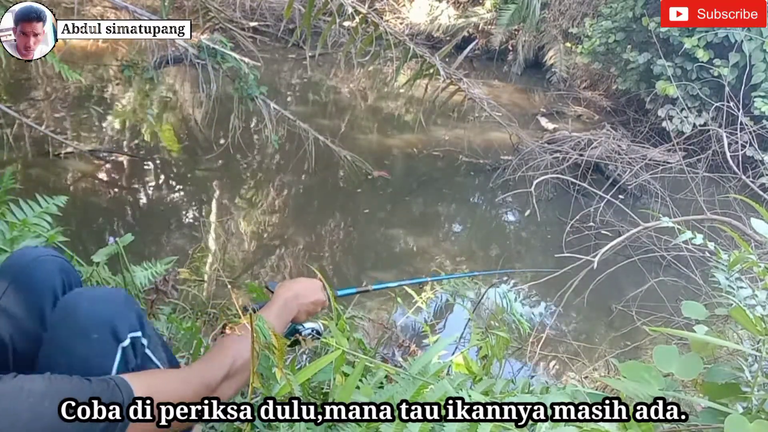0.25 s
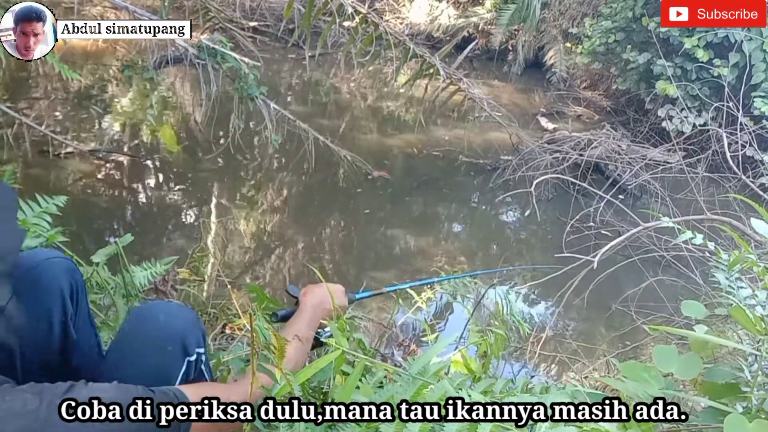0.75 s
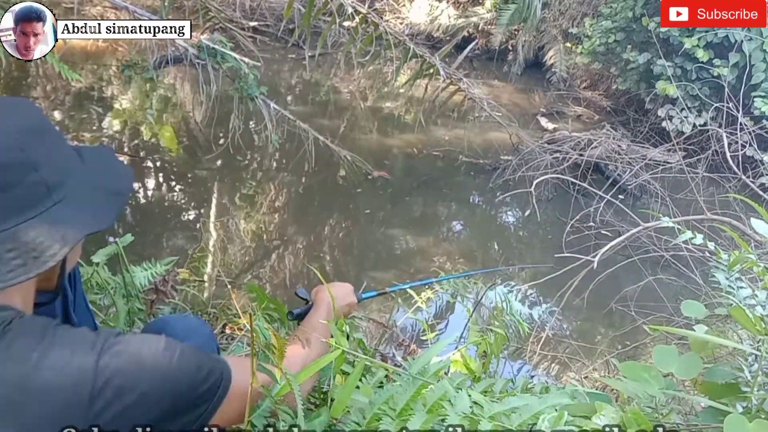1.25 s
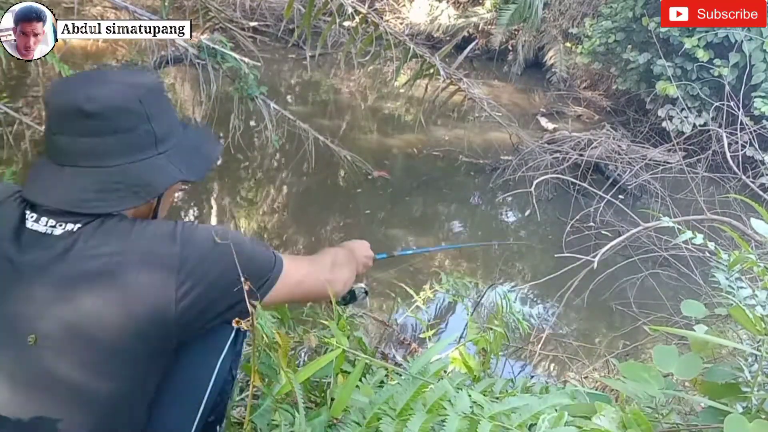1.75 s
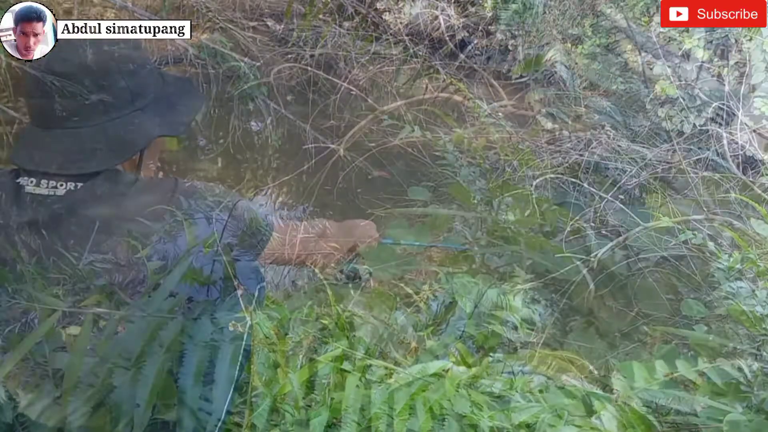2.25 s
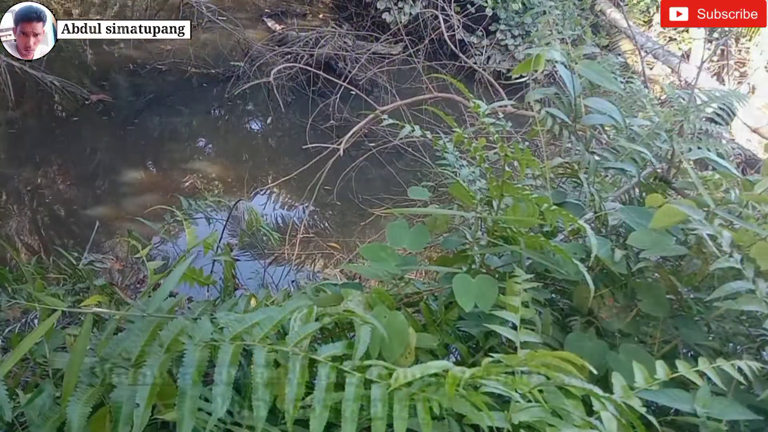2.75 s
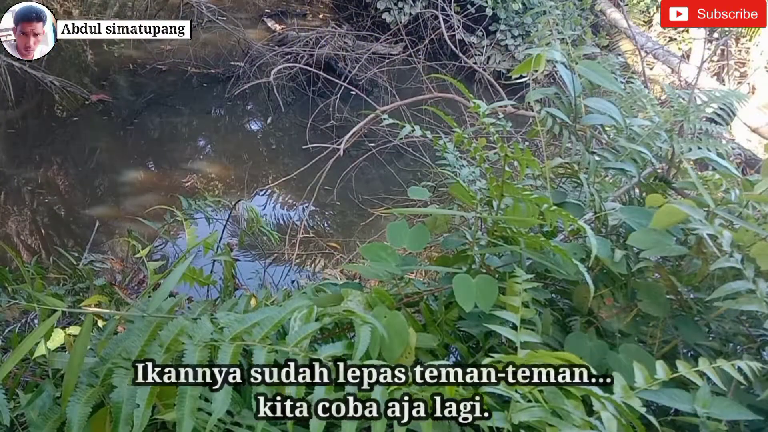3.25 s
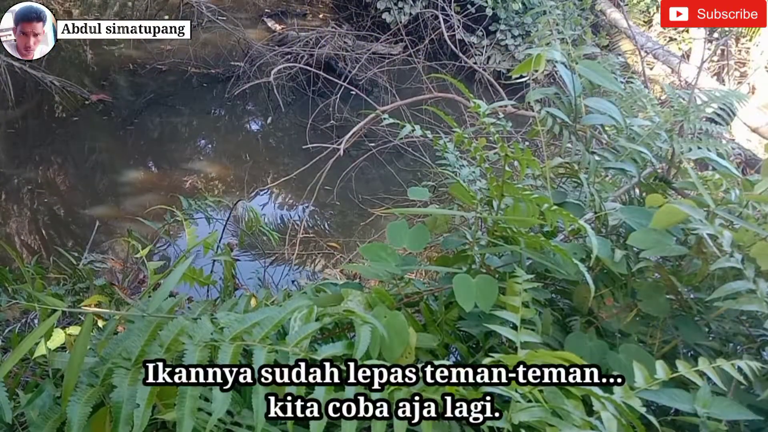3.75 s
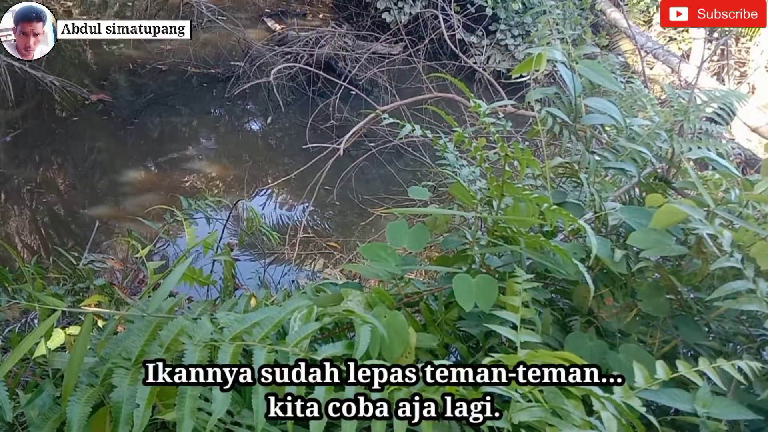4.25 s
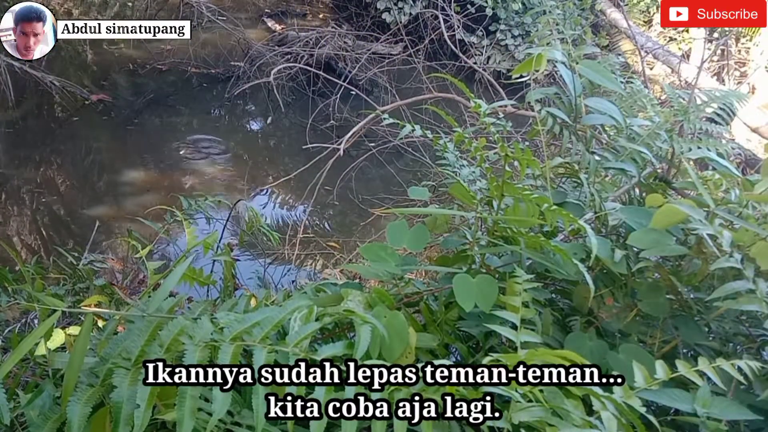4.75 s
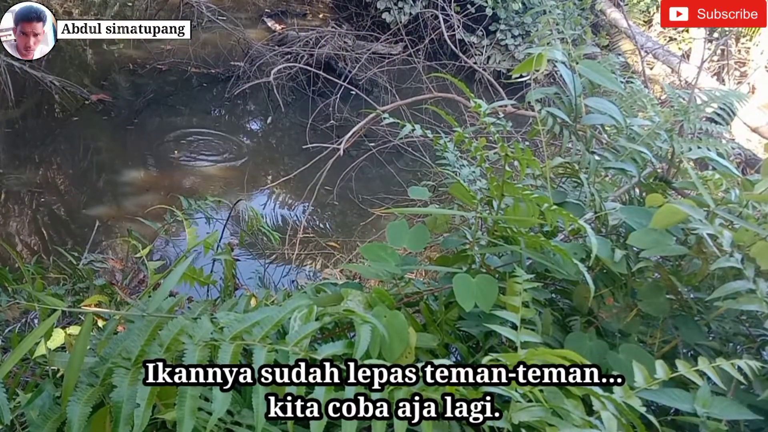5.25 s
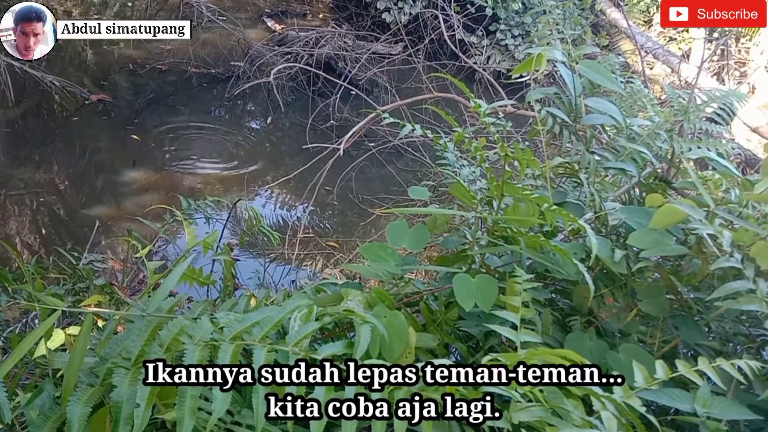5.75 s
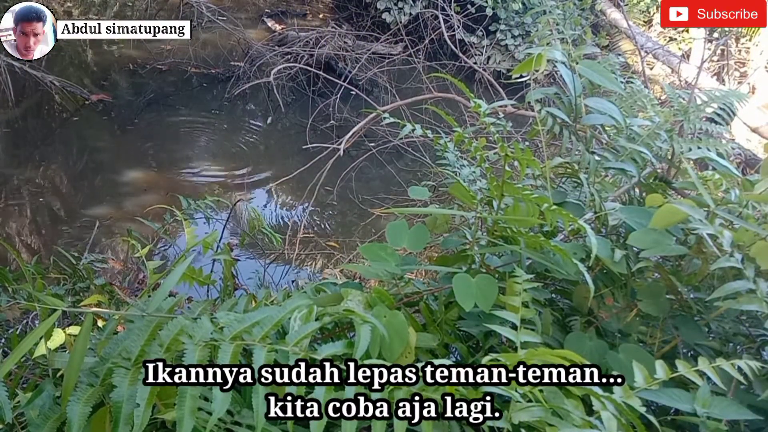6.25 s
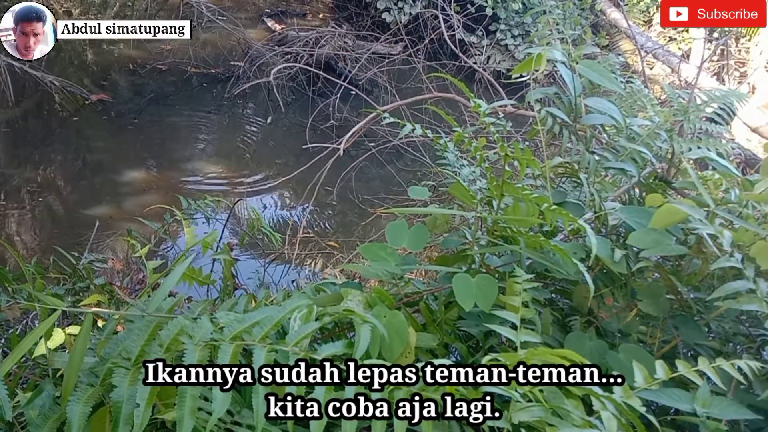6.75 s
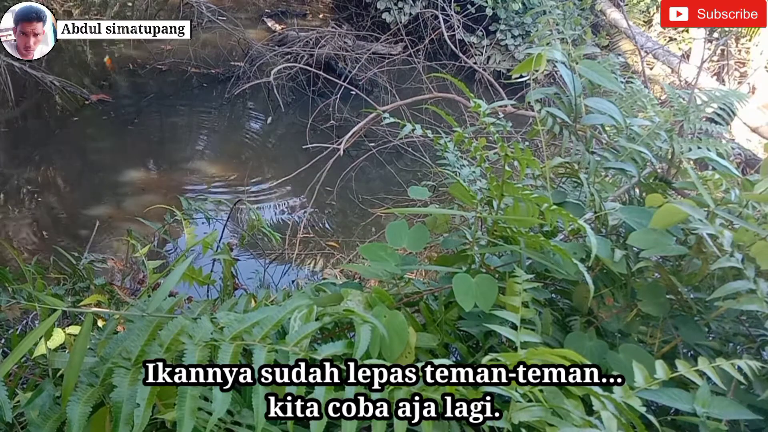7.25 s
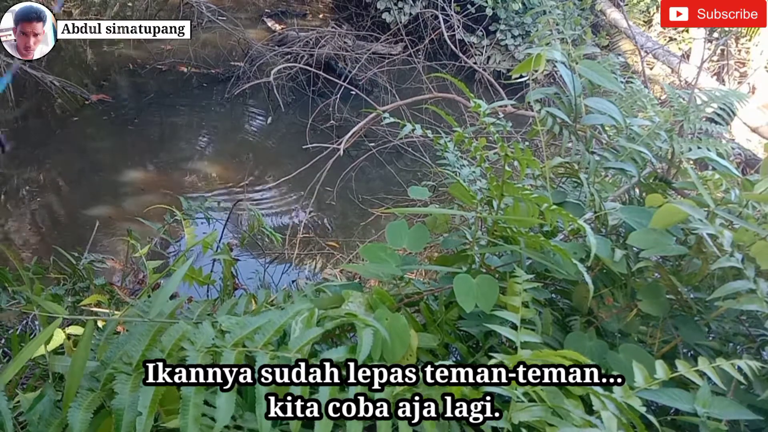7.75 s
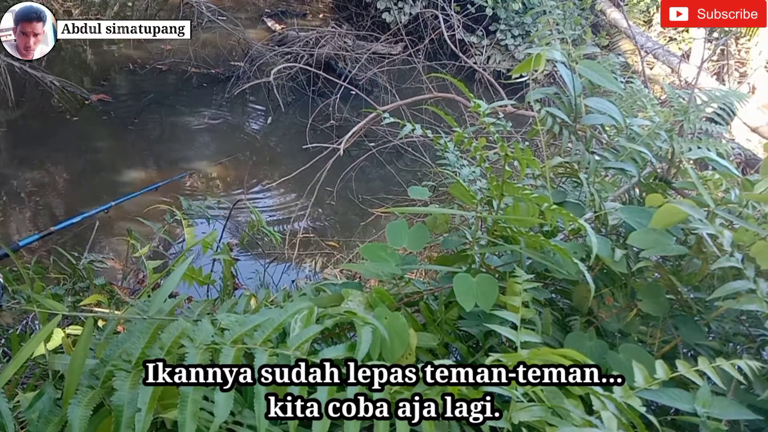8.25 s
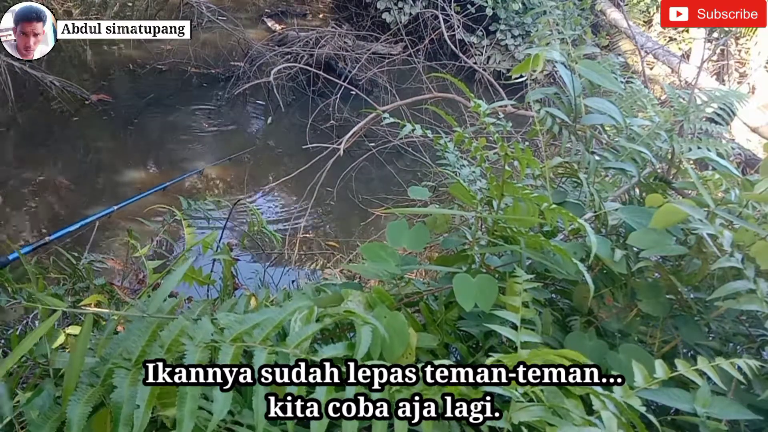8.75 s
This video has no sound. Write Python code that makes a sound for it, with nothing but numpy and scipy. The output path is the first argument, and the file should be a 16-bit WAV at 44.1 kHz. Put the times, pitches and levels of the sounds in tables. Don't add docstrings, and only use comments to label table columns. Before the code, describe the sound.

A high, steady cricket hiss covers a creek bank, with faint bird coos and whistles, twig snaps, and one loud crack echoing over water.

```python
import sys
import numpy as np
from scipy import signal
from scipy.fft import rfft, irfft
from scipy.io import wavfile

SR = 44100
rng = np.random.default_rng(int(sys.argv[2]) if len(sys.argv) > 2 else 0)


def gain_from_db(level_db):
    decades = np.asarray(level_db, float) / 20
    return 10 ** decades


def waveform_to_disk(signal):
    frames = np.transpose(np.atleast_2d(signal))
    scaled = np.clip(frames, -1, 1) * 32767
    samples = np.round(scaled).astype(np.int16)
    wavfile.write(sys.argv[1], SR, samples)


N = 396900
T = np.arange(N) / SR

# f/Hz, density/(dB per Hz)
FAR_CHORUS_SPECTRUM = [(4000, -71.5), (6800, -37), (7000, -43.5), (7120, -37), (7350, -14), (7980, -1),
                       (8250, 4), (8610, -5), (8960, -17.5), (9550, -24), (10500, -35), (13600, -67),
                       (22000, -120)]
# f/Hz, density/(dB per Hz)
KATYDID_SPECTRUM = [(9000, -48.5), (10000, -27), (11300, -19), (12000, -14.5), (13600, -4.5), (14900, 0.5),
                    (15800, 0)]
# f/Hz, density/(dB per Hz)
AIR_SPECTRUM = [(18, -33.5), (30, 1), (48, -1.5), (113, -0.5), (443, -9.5), (508, -9), (1130, -10),
                (1260, -6), (2190, -13), (2940, -11.5), (4540, -14.5), (6100, -25), (7000, -12),
                (9100, -50.5), (15400, -120)]
# far chorus level/dB, katydid level/dB, air level/dB
FIRST_SPOT_MIX = (-52.5, -64, -76)
SECOND_SPOT_MIX = (-53.5, -60, -76)
FADE_OUT_S, FADE_IN_S = (1.92, 3.04), (1.86, 3.42)
# f/Hz, start t/s, end t/s, level/dB
EARLY_REEDS = [
    (5850, 0, 0.53, -79.5),
    (5835, 0.55, 3.7, -82),
    (6560, 0.5, 3.3, -82.5),
    (6950, 0.015, 2.9, -80),
    (4580, .45, .8, -88),
]
# f/Hz, start t/s, end t/s, level/dB
LATER_REEDS = [(6470, 5.2, 6.4, -85), (6600, 8.5, 7.2, -83), (6430, 8.6, 9, -92), (4730, 4.74, 4.98, -79.5),
               (4700, 6.55, 6.8, -87), (4680, 6.9, 7.7, -88), (4680, 8.3, 8.95, -88),
               (4480, 3.3, 3.75, -88)]
# t/s, duration/s, f/Hz, level/dB
HOOTS = [(0, 0.086, 708, -76), (.72, 0.03, 690, -81), (2.4, 0.31, 700, -82.5), (2.62, 0.12, 693, -74.5),
         (7.35, 0.14, 685, -79), (8.07, 0.09, 696, -68.5), (8.17, 0.095, 692, -67.5),
         (8.265, .04, 693, -75)]
# t/s, peak level/dB
CHIRPS = [
    (0.098, -43),
    (3.203, -38.5),
    (3.2585, -37),
    (3.3134, -35),
    (3.37, -36.5),
    (3.704, -34.5),
    (3.756, -35.5),
    (3.814, -35.5),
]
# t/s, peak level/dB, ring f/Hz, rustle after it level/dB
CONTACTS = [(.1, -59.5, 1240, -11), (.27, -49.5, 1220, -10.5), (.272, -52.5, 3200, -13),
            (.829, -43, 5630, -19), (.832, -54, 1630, -10), (.882, -44.5, 5500, -22), (.884, -58, 1400, -18),
            (.918, -52, 5500, -16), (.92, -60, 1000, -16), (.941, -50, 4500, -14), (1.392, -58, 2600, -6),
            (1.392, -55, 6650, -8), (1.419, -41, 1400, -14.5), (1.467, -41, 1100, -14.5),
            (1.47, -38, 8900, -13.5), (1.47, -39, 4160, -12), (1.477, -45, 1200, -20),
            (1.486, -48, 2400, -11), (1.504, -46, 2150, -16), (1.504, -51, 3800, -4), (1.539, -48, 2100, -14),
            (1.54, -46, 3500, -12), (1.541, -49, 6200, -14), (1.765, -57.5, 12900, -2.5),
            (2.426, -61, 2700, -5), (2.428, -62, 5500, -8), (2.56, -50.5, 4330, -7), (2.57, -62, 1690, -2),
            (2.765, -66, 3500, -18),
            (3.357, -52.5, 2340, -12), (3.358, -58, 4300, -16), (3.424, -60, 1720, -12),
         (3.424, -62, 3900, -14), (4.081, -53, 5900, -11.5), (4.1287, -55, 6950, -22),
         (4.226, -57, 3000, -3), (4.251, -52, 3100, -10), (4.289, -58, 1000, -12), (4.275, -61, 3900, -4),
         (4.582, -62, 3800, -10), (5.6, -60, 6500, -10), (5.695, -46, 8200, -22), (7.844, -55, 4000, -3),
         (7.854, -37, 4100, -11), (7.856, -40, 3000, -22), (7.866, -57, 1500, -5), (7.886, -52, 1150, -7),
         (7.8825, -42, 1920, -10), (7.886, -40, 4700, -16), (8.739, -49, 1525, -12),
         (8.741, -54, 2310, -26)]
# f/Hz, density/(dB per Hz)
RUSTLE_SPECTRUM = [(180, -16), (300, 4), (607, -46), (722, -10), (1300, -4), (1980, -7.5), (2420, -1.5),
                   (4520, 1.5), (7200, 3.5), (9360, -12), (15800, -120)]
# f/Hz, density/(dB per Hz)
CONTACT_TOP_SPECTRUM = [(9000, 7.5), (15500, -9)]
# t/s, duration/s, f/Hz, level/dB, end pitch over start pitch
SLIDES = [
    (.125, .09, 1740, -70, 1.3),
    (.19, .045, 2270, -73, 1.01),
    (.445, .075, 1760, -70, 1.22),
    (.5, .05, 2130, -70, 1.04),
    (.14, 0.088, 1096, -67, .82),
]
# t/s, duration/s, f/Hz, level/dB
WHISTLES = [(.16, .08, 1276, -74), (.16, 0.075, 2900, -75), (0.301, .12, 1400, -82), (3.63, .12, 1236, -79),
            (3.76, 0.12, 1283, -78.5), (5.068, .06, 1610, -75.5), (5.177, 0.05, 1440, -67.5),
            (5.29, 0.086, 1455, -71.5), (5.421, 0.053, 1454, -70.5), (5.549, 0.056, 1620, -77),
            (6.22, .1, 1300, -66), (6.33, .07, 1250, -72), (6.415, 0.094, 1365, -64.5)]
# t/s, duration/s, f/Hz, level/dB, end pitch over start pitch
CLEAR_WHISTLES = [
    (8.3, 0.17, 1065, -66, 0.96),
    (8.42, 0.175, 1005, -65, 0.97),
    (6.3, .1, 1004, -72, .99),
]
# pitch ratio, level/dB
CLEAR_OVERTONES = [
    (4 / 3, -15),
    (5 / 3, -16),
]
# middle t/s, half length/s, level/dB, lowest f/Hz
BRUSHES = [(.2, .05, -73, 800), (1.445, .04, -63, 1500), (1.555, 0.045, -57, 2300),
           (2.583, 0.044, -65, 900), (2.96, 0.07, -69.5, 1000), (7.93, .055, -60.5, 3200),
           (3.1, .07, -75, 1500)]
# t/s, level/dB, f/Hz
THUMPS = [
    (4.79, -56, 60),
    (0.283, -64, 300),
    (.275, -66, 430),
    (6.235, -62, 160),
    (1.48, -65, 260),
]
# t/s, peak level/dB, f/Hz, rise/s, t60/s
KNOCKS = [(4.191, -43, 2210, 0.008, 0.025), (4.214, -43, 920, 0.004, 0.085), (4.211, -47, 2230, .006, .035),
          (4.92, -68, 2300, .03, .15), (4.581, -62, 2400, .003, .12), (.829, -60, 2700, .003, .15),
          (4.214, -50, 1430, .003, .07), (4.224, -53, 2200, .006, 0.083), (4.226, -55, 4350, 0.018, .1),
          (4.215, -68, 5950, .01, .2), (7.89, -63, 752, 0.006, 0.14), (7.873, -45, 1560, 0.005, 0.02),
          (7.9, -62, 3390, .02, .3), (7.9, -65, 4300, .02, .3)]
# t/s, peak level/dB, lowest f/Hz, highest f/Hz
SNAPS = [
    (7.851, -23, 2800, 7000),
    (7.886, -29, 3300, 7800),
    (1.469, -28.5, 840, 20000),
    (1.421, -39, 900, 9400),
    (.830, -43, 1200, 6400),
    (8.740, -52, 1600, 3400),
]
# t/s, duration/s, f/Hz, level/dB
COOS = [(1.24, .09, 345, -70), (1.3, .085, 356, -64), (1.37, .05, 350, -72), (1.47, .08, 330, -72),
        (1.54, .075, 342, -65.5), (1.6, .05, 348, -68), (1.635, .065, 354, -65), (1.94, .075, 354, -66),
        (4.29, 0.093, 317, -76.5)]
# t/s, duration/s, f/Hz, level/dB, end pitch over start pitch
CHATTER = [(5.07, 0.066, 3400, -69, 0.93), (5.17, .11, 3370, -65.5, 0.92), (5.25, .12, 3370, -70, 0.93),
           (5.295, .12, 3160, -67.5, 0.96), (5.42, .07, 3450, -70, .96), (5.43, 0.1, 3100, -67.5, .96),
           (5.555, 0.094, 3120, -65, 1.03), (1.755, 0.056, 2650, -66, 1.13),
           (1.75, 0.069, 2400, -70.5, 1.08)]
# t/s, duration/s, f/Hz, level/dB
PIPER = [(2.1, 0.25, 2930, -82), (5.17, 0.28, 2840, -72), (5.55, .1, 2858, -78), (5.82, 0.23, 2858, -74),
         (7.3, .12, 2950, -79), (7.43, .06, 2960, -78), (7.49, 0.2, 2960, -70.5), (7.67, .165, 2945, -69),
         (7.99, .06, 2955, -71), (8.04, .11, 2936, -68), (8.185, 0.055, 2930, -71), (8.26, .07, 2920, -80),
         (8.35, 0.085, 2906, -67), (8.49, 0.11, 2924, -63), (8.57, 0.15, 2946, -63),
         (8.72, 0.078, 2924, -59), (8.75, 0.18, 2904, -60), (8.84, .28, 2924, -56.5)]
# t/s, duration/s, f/Hz, level/dB
TWITTER = [(3.4, .08, 4100, -83), (3.46, .06, 5500, -79), (3.5, .03, 4420, -79), (2.66, .09, 4850, -82),
           (2.88, .06, 3250, -78), (3.31, .05, 4750, -80), (3.56, .04, 4120, -74), (3.57, .05, 4480, -79),
           (3.66, .04, 5050, -80), (3.71, .09, 4370, -74), (3.78, 0.16, 3980, -75.5),
           (3.87, .055, 4180, -72.5), (3.94, 0.091, 4800, -79), (4.0, .08, 3960, -73)]
TRILLS = [3.04, 3.87, 4.75, 5.6, 6.43, 7.31, 8.16]
# f/Hz, level/dB, t60/s
CRACK_MODES = [
    (1250, 4.5, 0.007),
    (610, -1, 0.013),
    (330, -11, 0.0022),
    (152, -10.5, 0.018),
    (2800, -7.5, 0.0065),
]
# start level/dB, t60/s, end of near trunks t/s, lift by far bank level/dB
ECHO_BANDS = [
    (-50.5, .8, .23, 1.5),
    (-41, .6, 0.14, 6),
    (-33.5, .6, .6, 5.5),
    (-32.5, 0.58, .26, 1.5),
    (-44, .75, .22, 1.5),
]
# f/Hz, density/(dB per Hz)
ECHO_SPECTRUM = [(29, -65.5), (50, -37.5), (81, -15), (133, -9.5), (270, -20), (409, -6), (700, -9.5),
                 (950, -2), (1400, -2), (1710, -12.5), (3100, -6), (4500, -13), (5200, -23), (6060, -25),
                 (8260, -18), (9310, -32), (11300, -35), (15000, -26)]


def rms_one(x):
    return x / np.sqrt(np.mean(x ** 2) + 1e-20)


def coloured(x, spectrum, low_hz=1, high_hz=SR):
    hz = np.maximum(np.arange(len(x) // 2 + 1) * SR / len(x), 1)
    points_hz, points_db = np.transpose(spectrum)
    gain = gain_from_db(np.interp(np.log(hz), np.log(points_hz), points_db, left=-120))
    edges = (1 + (low_hz / hz) ** 8) * (1 + (hz / high_hz) ** 8)
    return rms_one(irfft(rfft(x) * gain / np.sqrt(edges), len(x)))


def band(x, order, low_hz, high_hz):
    return signal.sosfilt(signal.butter(order, [low_hz, high_hz], "band", fs=SR, output="sos"), x)


def drift(rate_hz):
    r = np.exp(-32 * np.pi * rate_hz / SR)
    noise = rng.standard_normal(N // 16 + 2002)
    slow = signal.lfilter([1], [1, -2 * r, r * r], noise)[2000:]
    return np.interp(np.arange(N) / 16, np.arange(len(slow)), rms_one(slow))


def ring(x, hz, t60):
    r, w = gain_from_db(-60 / (t60 * SR)), 2 * np.pi * hz / SR
    return signal.lfilter([0, np.sin(w)], [1, -2 * r * np.cos(w), r * r], x + 1e-18)


def strokes(rate_hz, depth):
    phase = np.cumsum(rate_hz * (1 + .02 * drift(3))) / SR
    return 1 - np.clip(depth, 0, 1) * np.sin(np.pi * phase) ** 2


def shaped(rows, rise, fall, edge_db):
    shape = [(0, edge_db), (rise, 0), (max(1 - fall, rise), 0), (1, edge_db)]
    notes = []
    for s, length, hz, db, *slide in rows:
        ratio = slide[0] if slide else 1
        notes.append([(s + share * length, hz * ratio ** share, db + drop_db) for share, drop_db in shape])
    return notes


def song(notes, blur_hz, rough):
    out, share = np.zeros(N), np.clip(rough, 0, 1)
    paths = np.sqrt(1 - share) + np.sqrt(share / 2) * (drift(blur_hz) + 1j * drift(blur_hz))
    for k, rows in enumerate(notes):
        a, b = max(round(rows[0][0] * SR), 0), min(round(rows[-1][0] * SR), N)
        t = T[a:b]
        s, points_hz, points_db = np.transpose(rows)
        hz, level_db = np.interp(t, s, points_hz), np.interp(t, s, points_db)
        own = np.take(paths, np.arange(a, b) + 9973 * k, mode="wrap")
        tone = np.sqrt(2) * np.real(own * np.exp(2j * np.pi * np.cumsum(hz) / SR))
        fade = np.clip(np.minimum(t - T[a], T[b - 1] - t + (b == N)) / 0.0053, 0, 1)
        out[a:b] += gain_from_db(level_db) * tone * fade
    return out


def trees(x, wet_db, t60):
    t = np.arange(SR // 2) / SR
    tail = rng.standard_normal(len(t)) * gain_from_db(-60 * t / t60)
    return x + gain_from_db(wet_db) * signal.fftconvolve(x, tail / np.sqrt(np.sum(tail ** 2)))[:N]


def spots():
    return np.interp(T, FADE_OUT_S, [1, 0]), np.interp(T, FADE_IN_S, [0, 1])


def air(level_db):
    hz = np.arange(N // 2 + 1) * SR / N
    spectrum = rfft(coloured(rng.standard_normal(N), AIR_SPECTRUM + [(16000, -60)]))
    edges = np.append(0, 100 * 2 ** np.arange(9))
    hush = np.zeros(N)
    for low, high in zip(edges, edges[1:]):
        octave = irfft(spectrum * (hz >= low) * (hz < high), N)
        hush += octave * gain_from_db(1.6 * drift(5.))
    draws = rng.random((110, 4)) * [8.7, 4400, 8, .1] + [0, 900, 0, .03]
    blinks = [[(s, hz, -8), (s + .03, hz, db), (s + .03 + length, hz * .98, db - 8)]
              for s, hz, db, length in draws]
    return gain_from_db(level_db) * (gain_from_db(-.1) * hush + gain_from_db(-12.5) * song(blinks, blur_hz=70, rough=1))


def chorus():
    first, second = spots()
    far_db, fizz_db, air_db = (20 * np.log10(np.hypot(gain_from_db(a) * first, gain_from_db(b) * second))
                               for a, b in zip(FIRST_SPOT_MIX, SECOND_SPOT_MIX))
    far = coloured(rng.standard_normal(N) * gain_from_db(.5 * drift(25.)), FAR_CHORUS_SPECTRUM)
    scrape = rng.standard_normal(N) * strokes(92, depth=.35) * gain_from_db(.6 * drift(17.0))
    fizz = coloured(scrape, KATYDID_SPECTRUM)
    return gain_from_db(far_db) * far + gain_from_db(fizz_db + 6) * fizz + air(air_db)


def near_cricket():
    pitch_hz, level_db = 7915, -49
    phase = 2 * np.pi * np.cumsum(16.9 * (1 + .01 * drift(2))) / SR
    beat = (1 + .4 * np.cos(phase)) * (1 + .45 * np.cos(3 * phase))
    drone = song([[(0, pitch_hz, level_db), (FADE_OUT_S[1], pitch_hz, level_db)]], blur_hz=55., rough=0.93)
    return gain_from_db(-2.5) * beat * spots()[0] * drone


def far_crickets():
    early, late = ([[(a, hz, db - 4), (a + .05, hz, db), (b - .05, hz, db), (b, hz, db - 5)]
                    for hz, a, b, db in rows] for rows in (EARLY_REEDS, LATER_REEDS))
    first_spot = spots()[0] * song(early, blur_hz=37.8, rough=1.0)
    return gain_from_db(2.5 * drift(6.)) * (first_spot + song(late, blur_hz=90., rough=0.99))


def hooter():
    return song(shaped(HOOTS, rise=.5, fall=.45, edge_db=-12.5), blur_hz=14., rough=.2)


def chirps():
    out = np.zeros(N)
    pitch_hz, length_s = 8225, 0.022
    t = np.arange(round(length_s * SR)) / SR
    shape = np.sin(np.pi / 2 * np.clip(np.minimum(t / .006, (length_s - t) / .005), 0, 1)) ** 2
    note = shape * np.sin(2 * np.pi * (pitch_hz * t + 1500 * t * t))
    for s, peak_db in CHIRPS:
        a = round(s * SR)
        out[a:a + len(t)] += gain_from_db(peak_db - 5.0) * note
    return out


def clicks():
    rustle_t60_s = 0.22
    out, t = np.zeros(N), np.arange(SR // 4) / SR
    rustle = coloured(rng.standard_normal(N), RUSTLE_SPECTRUM[:-1] + CONTACT_TOP_SPECTRUM)
    grit_db = 3.0 * drift(110.)
    contacts = CONTACTS
    bands = .6 * 3 ** rng.random((len(contacts), 4))
    for k, (s, peak_db, hz, rustle_db) in enumerate(contacts):
        a = round(s * SR)
        ring_t60_s = 0.016 * (2000 / hz) ** 0.49
        own = slice(7001 * k, 7001 * k + len(t))
        raw = band(rustle[own], 4, hz * 0.59, min(hz * 2.8, 20000))
        resonance = rms_one(ring(raw, hz, 1.35 / hz))
        uneven = rms_one(sum(ring(raw, min(f * hz, 15000), 0.018) for f in bands[k]))
        noise = 0.49 * rms_one(raw) + 0.65 * resonance + 0.6 * uneven
        snap = raw * gain_from_db(-60 * t / 0.0046)
        body = ring(noise * gain_from_db(-60 * t / 0.011), hz, max(ring_t60_s, .002))
        tail = gain_from_db(rustle_db - 60 * t / rustle_t60_s + grit_db[own]) * noise
        hit = 0.37 * snap / np.abs(snap).max() + 0.61 * body / np.abs(body).max() + 0.64 * tail
        out[a:a + len(t)] += gain_from_db(peak_db) * hit
    return out


def far_whistles():
    overtones = [(s, length, hz * ratio, db + less_db, slide)
                 for s, length, hz, db, slide in CLEAR_WHISTLES[:2] for ratio, less_db in CLEAR_OVERTONES]
    notes = shaped(SLIDES + WHISTLES + overtones, rise=.45, fall=0.34, edge_db=-8)
    return trees(song(notes, blur_hz=83.0, rough=0.85), wet_db=-4.5, t60=0.29)


def brushes():
    rustle = coloured(rng.standard_normal(N) * gain_from_db(2.2 * drift(90.)), RUSTLE_SPECTRUM)
    return sum(gain_from_db(db) * np.exp(-((T - s) / half) ** 2) * band(rustle, 3, low_hz, 5100.)
               for s, half, db, low_hz in BRUSHES)


def thumps():
    return sum(gain_from_db(db) * np.exp(-((T - s) / 0.011) ** 2) * np.sin(2 * np.pi * hz * (T - s))
               for s, db, hz in THUMPS)


def knocks():
    notes = [[(s, hz, db - 20), (s + rise, hz, db - 4.5), (s + rise + t60 / 2, hz, db - 35.5)]
             for s, db, hz, rise, t60 in KNOCKS]
    return song(notes, blur_hz=110., rough=0.28)


def snaps():
    out = np.zeros(N)
    for s, peak_db, low_hz, high_hz in SNAPS:
        spike = band(signal.unit_impulse(400), 5, low_hz, high_hz)
        out[round(s * SR):][:400] += gain_from_db(peak_db) * spike / np.abs(spike).max()
    return out


def dove():
    return song(shaped(COOS, rise=.5, fall=.2, edge_db=-17), blur_hz=14., rough=.2)


def warbler():
    notes = shaped(CHATTER, rise=0.2, fall=0.32, edge_db=-7.5)
    return trees(song(notes, blur_hz=111.0, rough=.9), wet_db=-6.5, t60=0.21)


def piper():
    t = np.linspace(0, N / SR, N // 64)
    shapes = np.array(shaped(PIPER, rise=.25, fall=.2, edge_db=-12))
    level_db = np.max([np.interp(t, n[:, 0], n[:, 2], left=-120, right=-120) for n in shapes], axis=0)
    level_db = np.maximum(level_db, np.where(t > PIPER[4][0], -90, -120))
    hz = np.interp(t, shapes[:, 1, 0], shapes[:, 1, 1])
    return song([np.transpose([t, hz, level_db])], blur_hz=22., rough=.22)


def twitter():
    notes = shaped(TWITTER, rise=0.33, fall=.45, edge_db=-8)
    return trees(song(notes, blur_hz=55., rough=0.88), wet_db=-6.5, t60=0.21)


def trills():
    pitch_hz, length_s, level_db = 6362, .47, -71
    rows = [(s, length_s, pitch_hz, level_db) for s in TRILLS]
    phrases = song(shaped(rows, rise=0.087, fall=.17, edge_db=-13.5), blur_hz=70., rough=0.91)
    return strokes(67, depth=.35) * phrases


def lumpy(x, low_hz, high_hz):
    pitches = low_hz * (high_hz / low_hz) ** rng.random(8)
    return rms_one(x + .25 * rms_one(sum(ring(x, hz, .05) for hz in pitches)))


def crack():
    crack_s, crack_db = 6.0093, -15
    skip_s, skip_db = .00078, -1.5
    late_t60_s, far_bank_s, far_bank_spread_s = 0.27, .092, .02
    a = round(crack_s * SR) - 50
    t = T[a:a + SR] - crack_s
    blow, skip = (gain_from_db(crack_db + db) * np.exp(-((t - lag) / .00007) ** 2) / 5.9
                  for lag, db in [(0, 0), (skip_s, skip_db)])
    direct = sum(ring(blow + skip * (hz > 1000), hz, t60) * gain_from_db(db) for hz, db, t60 in CRACK_MODES)
    out = signal.sosfilt(signal.butter(3, 110., "high", fs=SR, output="sos"), direct)
    t = np.maximum(t, 0)
    far_bank = np.exp(-((t - far_bank_s) / far_bank_spread_s) ** 2)
    near_water_db = 3 * np.exp(-t / .04)
    edges = 1, 220, 750, 1700, 4800, SR
    for (db, t60, knee_s, lift_db), low, high in zip(ECHO_BANDS, edges, edges[1:]):
        decay_db = -60 * np.minimum(t, knee_s) / t60 - 60 * np.maximum(t - knee_s, 0) / late_t60_s
        level_db = db + decay_db + lift_db * far_bank + near_water_db
        rise = np.clip(t / (.02 if high == SR else 0.0057), 0, 1)
        noise = coloured(rng.standard_normal(SR), ECHO_SPECTRUM, low, high)
        answer = lumpy(noise, max(low, 90), min(high, 7000))
        out = out + rise * gain_from_db(level_db + 2.1 * drift(60.)[:SR]) * answer
    return np.pad(out, (a, N - a - SR))


def clear_whistles():
    return song(shaped(CLEAR_WHISTLES, rise=0.23, fall=0.42, edge_db=-11), blur_hz=14., rough=.2)


def scene():
    insects = chorus() + near_cricket() + far_crickets() + chirps() + piper() + trills()
    birds = hooter() + far_whistles() + dove() + warbler() + twitter() + clear_whistles()
    contacts = clicks() + brushes() + thumps() + knocks() + snaps() + crack()
    return (insects + birds + contacts)[None]


def top_cut(x):
    return signal.sosfilt(signal.butter(12, 16480, fs=SR, output="sos"), x)


def record(dry):
    low_cut_hz, top_hz = 60, 15470
    mix = signal.sosfilt(signal.butter(2, low_cut_hz, "high", fs=SR, output="sos"), dry)
    mix = signal.sosfilt(signal.ellip(12, .5, 80, top_hz, fs=SR, output="sos"), mix)
    return top_cut(mix)


dry = scene()
out = record(dry)
waveform_to_disk(out)
```